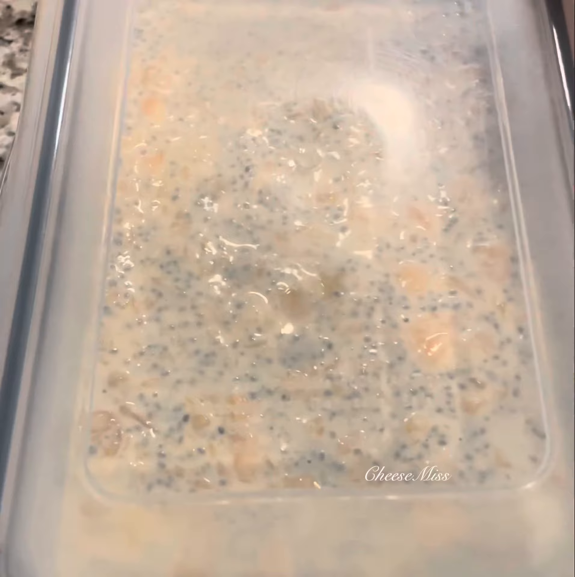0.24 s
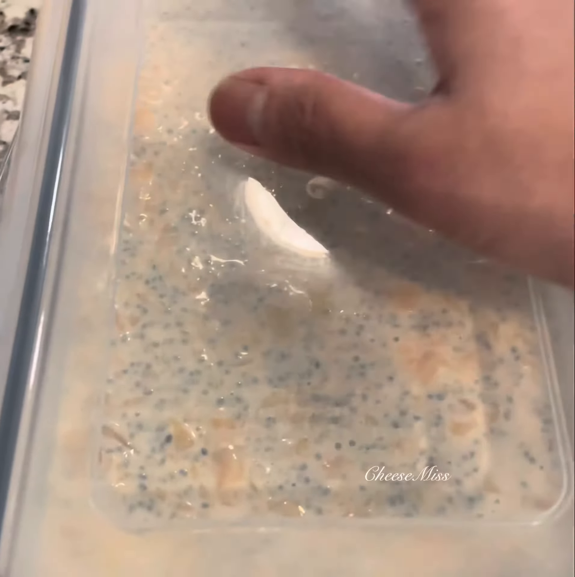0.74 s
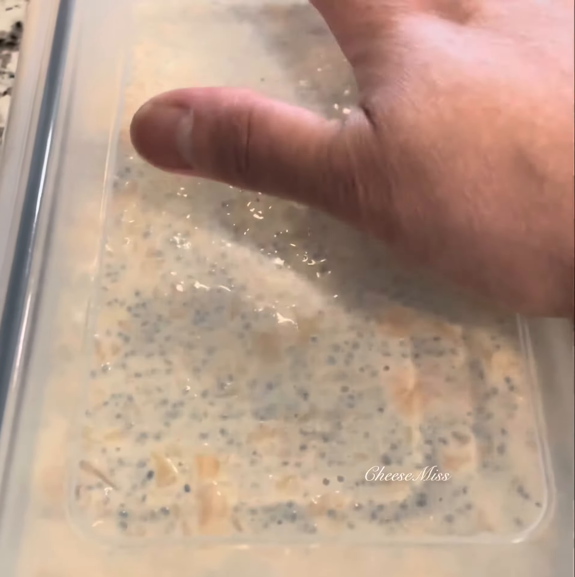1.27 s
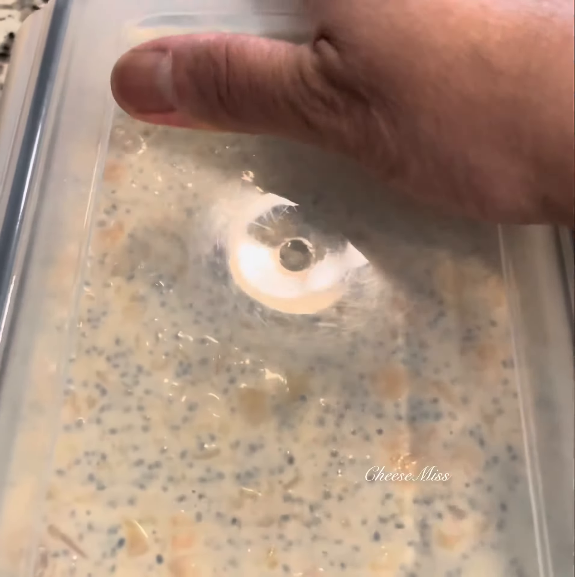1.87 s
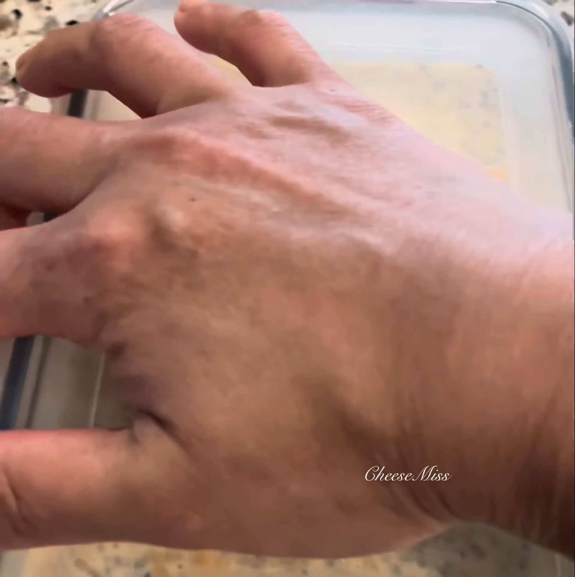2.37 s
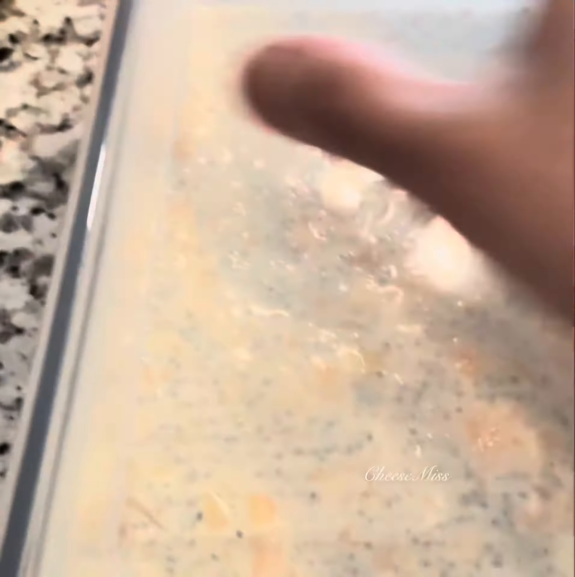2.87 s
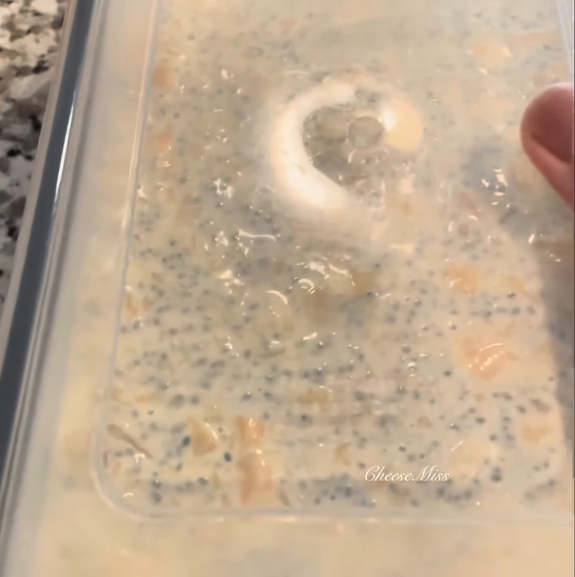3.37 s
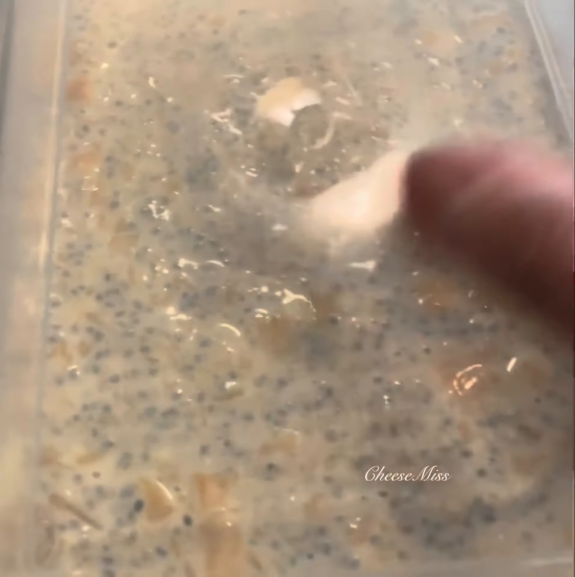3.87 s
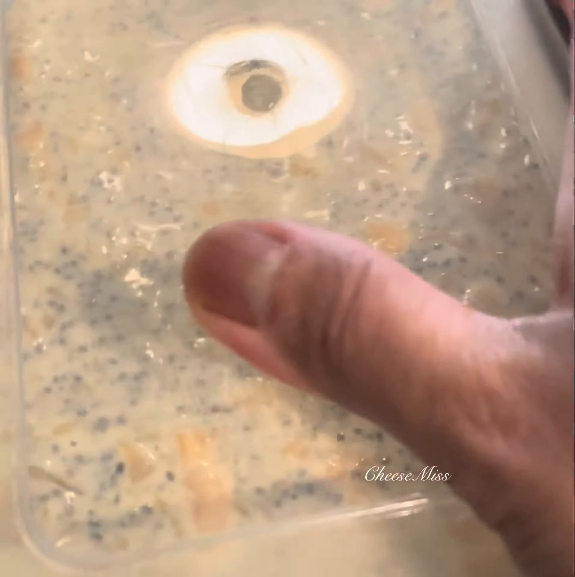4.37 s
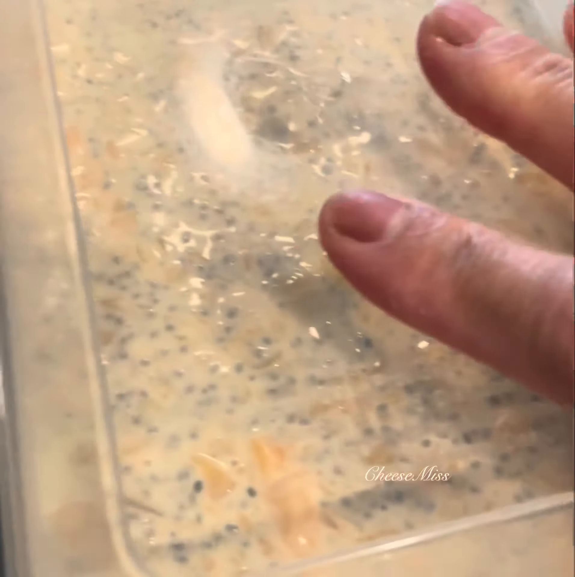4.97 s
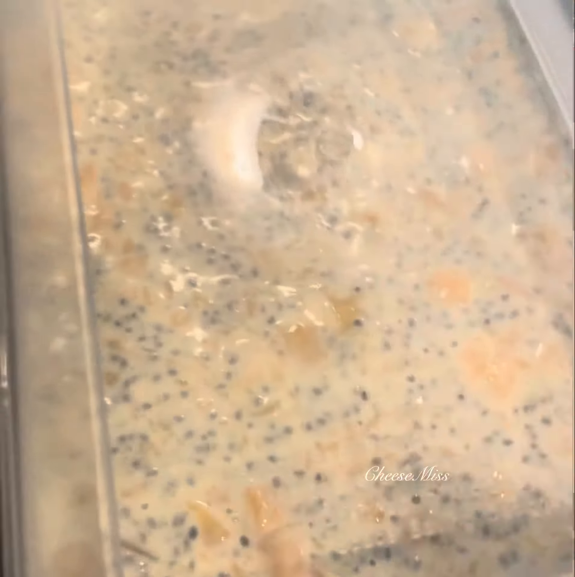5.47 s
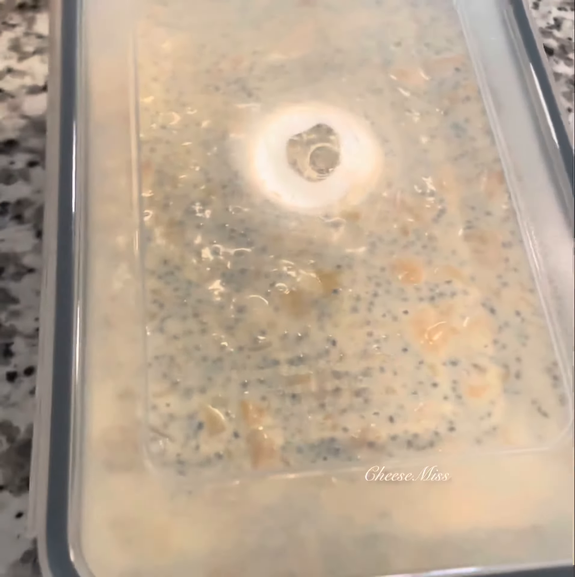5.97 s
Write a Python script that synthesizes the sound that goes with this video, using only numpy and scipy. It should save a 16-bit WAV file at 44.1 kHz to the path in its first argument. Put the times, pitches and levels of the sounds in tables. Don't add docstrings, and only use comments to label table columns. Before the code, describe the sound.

Close-up plastic lid rattles down and settles, followed by crisp latch clicks, soft palm thuds, faint seal creaks and skin rubbing over quiet room hum.

```python
import sys
import numpy as np
from scipy import signal
from scipy.fft import rfft, irfft, next_fast_len
from scipy.io import wavfile

SR = 44100
rng = np.random.default_rng(int(sys.argv[2]) if len(sys.argv) > 2 else 0)


def volts_from_decibels(level):
    exponent = np.asarray(level, float) / 20
    return 10 ** exponent


def dump_mix(stems):
    frames = np.atleast_2d(stems).T
    limited = np.clip(frames, -1, 1)
    pcm = np.round(limited * 32767).astype(np.int16)
    wavfile.write(sys.argv[1], SR, pcm)


N = 275184


def loose_lid():
    # start in seconds, strength in dB, panel note in Hz, weight in dB, softness in dB
    bounces = [(0.0271, -8, 878, -13, 21), (0.0837, -13, 862, -10, 17.5), (0.0948, -19, 800, -9, 19),
               (0.1058, -20.5, 770, -6.5, 21), (0.132, -32, 780, -8, 19), (0.1608, -24, 285, -13, 11),
               (0.2816, -37.5, 750, -4, 34), (0.3052, -31, 725, -11.5, 45), (0.3902, -26.5, 644, 4.5, 15),
               (0.3992, -20.5, 677, -5, 23), (0.4521, -12.5, 730, -21, 13.5),
               (0.4665, -14.5, 684, -17, 17.5), (0.4774, -7.5, 592, -11, 15),
               (0.4954, -17, 610, -9.5, 20.5), (0.4185, -31, 690, -18, 5), (0.5717, -43.5, 494, -5, -2),
               (0.7905, -38, 570, -26, 17)]
    return contacts(bounces, travel_s=0.001217, spread_s=0.00306, cycles=4.6, note_db=24.0,
                    trims_db=[6.0, 3.15, 4.3, 3.2], swell=1.7)


def latches():
    # start in seconds, strength in dB, panel note in Hz, weight in dB, softness in dB
    snaps = [(1.1093, -23.5, 1150, -8, 32), (1.1176, -22, 541, -17, 26), (1.1239, -20, 750, -5, 22),
             (1.1317, -12, 338, -12, 8.5), (1.1434, -20, 368, 8, 4.5), (1.148, -32.5, 231, 16.5, 24),
             (1.721, -27, 433, -6, 3.5), (1.7376, -28, 453, 1.5, 2), (1.7639, -27.5, 455, -8, 19),
             (2.5143, -40, 247, 2, 1), (2.5202, -54, 493, 4.7, -25), (4.378, -31, 293, -17, 7),
             (4.5049, -33, 427, -5, 17), (4.5186, -29.5, 194, -17, 22), (4.5343, -30, 527, -16, 9),
             (4.545, -30, 554, -17, 15), (4.5594, -41.5, 423, 3, 3)]
    # start in seconds, strength in dB, panel note in Hz, weight in dB, softness in dB
    far_snaps = [
        (1.7488, -5, 372, -5.5, 8.5),
        (2.4955, -54, 300, -7, -11),
        (2.5035, -20, 413, -2, -10.5),
        (4.3045, -19, 420, 0, 3.5),
        (4.3068, -11, 414, -4, 3),
        (4.311, -31, 267, 20.5, 6),
        (5.0345, -22.5, 302, 4.5, 4.5),
        (5.0442, -15, 434, -3, 3.5),
    ]
    near = contacts(snaps, travel_s=0.002037, spread_s=0.003984, cycles=5.0, note_db=18.0,
                    trims_db=[4.3, 0.1, 5.0, 2.3])
    far = contacts(far_snaps, travel_s=0.003003, spread_s=0.00288, cycles=2.93, note_db=13.0,
                   trims_db=[2.44, 1.6, 3.5, 5.66], swell=1.2)
    return near + far


def fingers():
    # start in seconds, strength in dB, panel note in Hz, weight in dB, softness in dB
    ticks = [(0.996, -34, 234, -10.5, 3), (1.5267, -32, 317, -9.5, 17), (2.1031, -33, 580, -10, 21),
             (2.1165, -40, 310, 6, 15), (2.2066, -33.5, 1060, -13.5, 8), (2.9722, -28, 483, -11, 10.5),
             (3.0539, -38, 300, 1.5, 21), (3.078, -37, 257, 9.5, 16), (3.634, -31.5, 353, -0.5, 28),
             (4.0334, -34.5, 330, 4.5, 16.5), (4.058, -39.5, 177, 10, 19.5), (4.8087, -32, 494, -.6, 12.5),
             (5.248, -31.5, 550, -25, 22), (5.272, -32.5, 373, -8, 31)]
    # start in seconds, strength in dB, panel note in Hz, weight in dB, softness in dB
    scuffs = [(.0024, -49.5, 770, -16, -1), (.444, -24, 760, -10, 14.5), (2.083, -45, 231, 2, 9.5),
              (2.831, -43, 376, 6, 3.5), (3.022, -37.5, 530, -8, 14.5), (3.1916, -35.5, 207, 1, 2.5),
              (3.779, -40.5, 470, 8, 12.5), (4.256, -48.5, 420, 10, 4)]
    ticking = contacts(ticks, travel_s=0.002095, spread_s=0.00317, cycles=4.2, note_db=14.5,
                       trims_db=[4.6, .3, 6.7, 1.5])
    scuffing = contacts(scuffs, travel_s=0.0018, spread_s=0.013, cycles=3.3, note_db=14.5,
                        trims_db=[3.0, -3.0, 5.0, 5.0], fade=0.67)
    return ticking + scuffing


def fingertip_taps():
    # start in seconds, strength in dB, panel note in Hz, weight in dB, softness in dB
    taps = [(2.941, -46, 541, -5, 15), (3.745, -45.5, 420, -2, 12), (3.768, -60, 500, -8, -6),
            (3.798, -45.5, 400, -6, 5), (3.923, -51, 2100, -8, 20), (3.946, -45.5, 400, 2, 13.5),
            (3.969, -45.5, 1900, -6, 12), (3.984, -42, 458, 2, 14), (4.012, -49, 431, 4, 18),
            (4.062, -44, 220, 6, 8), (2.135, -44, 300, 3.5, 18.5), (4.552, -38, 500, -8, 14)]
    return contacts(taps, travel_s=0.001906, spread_s=.003, cycles=4.0, note_db=15, trims_db=[4, .3, 5, 3.3])


def contacts(table, travel_s, spread_s, cycles, note_db, trims_db, fade=1.86, swell=1):
    band_hz = [230, 820, 2100, 4600]
    # frequency in Hz, level in dB
    air = [(2200, -3), (3200, -5), (4600, 2.5), (6300, -2.5), (7600, -21), (10500, -7.5), (14000, -29),
           (16500, -33.5)]
    # frequency in Hz, left-right level in dB, left lead in radians
    port_pair = [(152, -1, 0.04), (348, 2, 0.3), (800, -5, -1.37), (1500, -4, -0.28), (3140, 0, 1),
                 (9100, 1.5, -1.5)]
    size, paths, out = 2048, 16, np.zeros((2, N + 2048))
    hz = np.fft.rfftfreq(size, 1 / SR)
    place = np.interp(np.log(hz + 1), np.log(band_hz), np.arange(4))
    bands = np.array([np.cos(np.pi / 2 * np.clip(place - k, -1, 1)) ** 2 for k in range(4)])
    bands *= volts_from_decibels(at_hz(air, hz)) * (hz / 110) ** 2 / (1 + (hz / 110) ** 2)
    half = np.array([[.5], [-.5]])
    ports = volts_from_decibels(half * at_hz(port_pair, hz)) * np.exp(1j * half * at_hz(port_pair, hz, column=2))
    chances = rng.random((len(table), 3, paths))
    for (s, knock_db, note_hz, weight_db, soft_db), luck in zip(table, chances):
        late = np.arange(paths) / paths * (0.6896 + 0.6223 * luck[0])
        gain = np.exp(-fade * late) * np.where(luck[1] < .5, -1, 1) * (.5 + luck[0])
        skew = 0.00012 * (luck[2] - .5) * half
        bend = 2 * travel_s * (1 + 1.5325 * late[:, None]) * np.sqrt(1000 * hz)
        turns = bend + (spread_s * late + skew)[:, :, None] * hz
        wave = np.einsum("p,cpf->cf", gain, np.exp(-2j * np.pi * turns))
        first = np.exp(-2j * np.pi * bend[0])
        detune = hz / note_hz - note_hz / (hz + 1)
        note = volts_from_decibels(note_db) / (1 + 1j * cycles * detune) ** swell
        parts = irfft((wave + note * first) * ports * bands[:, None], size)
        parts /= np.abs(parts.mean(axis=1)).max(axis=1)[:, None, None]
        blow = volts_from_decibels(knock_db + np.array([weight_db, 0, -0.64 * soft_db, -soft_db]) + trims_db)
        hit = np.einsum("b,bct->ct", blow, parts)
        at = max(round((s - travel_s * 0.4405) * SR), 0)
        out[:, at:at + 1792] += irfft(rfft(hit) * blow_colour(s, hz), size)[:, :1792]
    return out[:, :N]


def blow_colour(s, hz):
    # time in
    # seconds, band centre in Hz, lift in dB, sharpness (no unit)
    band_lifts = [(.027, 405, -8.5, 4.0), (.027, 1320, -8, 8.2), (.027, 5200, 5.5, 6.1), (.084, 400, -9, 5.0),
                     (.084, 2580, 8, 6.0), (.084, 15000, -8, 2.5), (.458, 2710, 4, 5.4), (.474, 140, -7, 3.0),
                     (.474, 356, 6.5, 6.7), (.474, 5170, 8, 7.4), (.474, 15600, -19, 3.2), (1.138, 509, 4.5, 8.7),
                     (1.138, 10600, 6.5, 1.5), (1.75, 120, -5, 2.5), (1.75, 1080, 3.5, 2.7),
                     (1.75, 1680, -19.5, 5.1), (1.75, 2730, 8.5, 8.5), (1.75, 4120, 8.5, 6.0),
                     (1.75, 4900, -10, 6.8), (1.75, 6200, -16, 5.4), (1.75, 12500, 5, 1.5), (2.5, 120, -4, 3.0),
                     (2.5, 219, 13, 2.5), (2.5, 320, -4, 5.4), (2.5, 766, 10, 4.5), (2.5, 1680, 5, 4.9),
                     (2.5, 2250, 5, 5.0), (2.5, 2640, -6.5, 9.6), (4.308, 560, -8.5, 5.2), (4.308, 700, 9.5, 5),
                     (4.308, 860, 8, 5), (4.308, 1180, -5, 7.9), (4.308, 11500, 8, 5.0), (5.039, 140, -11, 2.1),
                     (5.039, 3100, -12, 7), (5.039, 6900, 3, 1.8), (5.039, 14500, -10, 2.5),
                     (.161, 490, 5.5, 4.0), (.161, 785, 9.5, 5.4), (.161, 1130, -9.5, 4.0),
                  (.161, 1510, 5.5, 6.0), (.161, 2760, -6, 6.0), (.394, 2350, 7, 4.0), (.394, 3150, -11, 5.0),
                  (.477, 1170, -6, 5.0), (.477, 12500, 12, 3.0), (.996, 2750, -7, 2.8),
                  (1.117, 4800, 7.5, 4.0), (1.527, 805, -8.5, 5.0), (1.527, 2600, 7, 4.0),
                  (1.527, 10500, -9, 1.5), (1.721, 2170, -7, 6.0), (1.721, 4440, -6, 6.0),
                  (1.736, 1450, 7, 3.0), (1.736, 3100, -10, 6.0), (1.736, 10800, -9, 3.0),
                  (2.207, 290, 8, 1.5), (2.207, 1580, -7, 4.4), (2.207, 3680, 10.5, 3.7),
                  (2.207, 5000, -9, 6.0), (2.972, 740, -11, 5.0), (2.972, 6350, 5, 6.0),
                  (3.077, 680, -11, 2.5), (3.077, 3100, -9, 6.0), (3.077, 5000, 8, 3.0),
                  (3.192, 3500, -8, 6.0), (3.779, 4840, 12, 4.0), (4.033, 220, 15, 3.0), (4.033, 600, -9, 5.0),
                  (4.033, 1200, 7, 6.0), (4.033, 1710, -10, 6.0), (4.378, 500, 6, 4.4), (4.378, 1060, -8, 6.0),
                  (4.809, 1700, -9, 3.0), (4.809, 2750, -13, 5.5), (4.809, 4000, 7, 2.3), (5.031, 584, 5, 5.6),
                  (5.031, 1710, -8, 7.2), (5.048, 221, 10.5, 4.7), (5.048, 790, 8, 4.3), (5.248, 523, 9, 1.5),
                  (5.248, 1030, -13, 3.0), (5.248, 2600, -9, 4.0)]
    colour = 1
    for struck_s, centre_hz, lift_db, sharpness in band_lifts:
        if abs(struck_s - s) < .0095:
            off = 1j * sharpness * (hz / centre_hz - centre_hz / (hz + 1))
            colour = colour * (volts_from_decibels(lift_db / 2) + off) / (volts_from_decibels(-lift_db / 2) + off)
    return colour


def rim_notes():
    # start in seconds, pitch in Hz, level in dB, time to fade by 60 dB in seconds
    rim = [(1.134, 1150, -16, 0.037), (1.721, 2580, -19, 0.021), (1.722, 1380, -22.5, 0.023),
           (1.7505, 1150, -12.5, 0.03), (1.7495, 4250, -17, 0.016), (2.837, 5420, -30, 0.012),
           (3.193, 2460, -28, 0.034), (3.194, 4300, -35, 0.021), (4.308, 1040, -14, 0.039),
           (5.045, 2050, -7.5, 0.02), (5.047, 503, -5, 0.019), (3.078, 1090, -31, 0.028),
           (3.783, 430, -33.5, 0.066), (3.199, 1190, -28.5, 0.021), (4.378, 1960, -27, 0.013),
           (1.767, 2120, -34, .09), (1.76, 985, -36, 0.22), (1.76, 1400, -36.5, .15),
           (5.068, 480, -38, .12), (5.06, 1090, -43, .12), (2.5145, 5300, -29, .012),
           (2.5046, 5200, -12, .008), (1.133, 5000, -20, .012), (4.32, 1100, -34.5, 0.14),
           (.422, 740, -29, .045), (.508, 650, -21, .025), (.532, 660, -28, .03), (1.752, 1010, -16, .03),
           (5.046, 1020, -16, .025), (2.506, 760, -18, .02), (.399, 5100, -36, .02)]
    return rings(rim, rise_s=.0005)


def rings(rows, rise_s):
    out, t = np.zeros(N + SR // 2), np.arange(SR // 2) / SR
    for s, hz, level_db, t60 in rows:
        at = round(s * SR)
        swelling = 1 - np.exp(-t / rise_s)
        out[at:at + len(t)] += volts_from_decibels(level_db - 60 * t / t60) * swelling * np.sin(2 * np.pi * hz * t)
    return out[:N]


def crackle(per_s, travel_s):
    # start in seconds, length in seconds, level in dB, swell in dB
    creeps = [
        (1.091, 0.039, -49, 22.5),
        (1.141, 0.033, -34.5, -20),
        (4.252, .055, -51, 7),
        (4.32, 0.053, -44, -12.5),
    ]
    # frequency in Hz, level in dB
    slip = [(150, -25), (500, 1.5), (1300, 7), (2800, -3), (6500, -21), (8000, -68)]
    sizes = volts_from_decibels(0.89 * np.minimum(rng.exponential(1, N), 3))
    slips = (rng.random(N) < per_s / SR) * rng.standard_normal(N) * sizes
    hz = np.fft.rfftfreq(2048, 1 / SR)
    chirp = irfft(volts_from_decibels(at_hz(slip, hz)) * np.exp(-4j * np.pi * travel_s * np.sqrt(1000 * hz)))
    grains = signal.fftconvolve(slips, chirp[:1024])[:N]
    ends = [[(s, db), (s + length, db + swell_db)] for s, length, db, swell_db in creeps]
    return grains / grains.std() * sum(gate(rows) * volts_from_decibels(in_time(rows)[0]) for rows in ends)


def along_the_rim():
    # time in seconds, left-right level in dB
    hand_place = [
        (.1, -.6),
        (.5, .3),
        (1.13, -1.2),
        (1.75, -2.2),
        (2.5, .3),
        (4.3, .3),
        (5.04, -2.2),
    ]
    return volts_from_decibels(in_time(hand_place)[0] * [[.5], [-.5]])


def port_colour(lid):
    # frequency in Hz, level in dB
    side_port = [(150, -6.5), (350, 0.5), (1000, 0.5), (4000, -0.5), (5400, -7.5), (7500, 14.5), (9800, -1),
                 (11000, -20.5), (12500, 3.5), (16000, 6)]
    side = (lid[0] - lid[1]) / 2
    size = next_fast_len(N)
    change = volts_from_decibels(at_hz(side_port, np.fft.rfftfreq(size, 1 / SR))) - 1
    return irfft(rfft(side, size) * change, size)[:N] * [[1], [-1]]


def palm_pushes():
    # start in seconds, level in dB, pitch in Hz
    pushes = [
        (0.021, -33, 129),
        (0.472, -21.5, 94),
        (1.148, -15.5, 81.5),
        (2.122, -30, 110),
        (3.079, -42, 132),
        (4.053, -29.5, 117),
        (4.305, -22.5, 127),
    ]
    return rings([(s, hz, level_db + 5.0, .09) for s, level_db, hz in pushes], rise_s=0.0022)


def creak():
    # start in seconds, length in seconds, level in dB, start in Hz, end in Hz
    creaks = [
        (3.472, 0.065, -42, 440, 425),
        (3.582, 0.05, -36, 390, 373),
        (3.665, 0.005, -38, 360, 343),
        (5.27, 0.037, -40, 460, 410),
    ]
    # start in seconds, length in seconds, level in dB, start in Hz, end in Hz
    whistles = [
        (2.444, 0.044, -54, 5610, 4360),
        (3.74, .04, -64, 5700, 4900),
    ]
    # start in seconds, length in seconds, level in dB, pitch in Hz, fade in dB
    buzzes = [
        (1.756, 0.16, -57, 4260, 16),
        (5.075, .12, -64, 2090, 12),
        (5.234, 0.11, -52.5, 2040, 12),
    ]
    seal = sum(squeak(glide(*row), width_hz=90, steady=2.6) for row in creaks)
    air, flap = 0, 0
    for s, length, db, a, b in whistles:
        air = air + squeak(glide(s, length, db, a, b, -3.0), width_hz=420, steady=0)
        air = air + squeak(glide(s, length, db - 5, 2 * a, 2 * b, -2.5), width_hz=460, steady=0)
    for s, length, db, hz, fades_db in buzzes:
        flap = flap + squeak(glide(s, length, db, hz, hz, fades_db), width_hz=hz / 15, steady=.4)
    return seal + (air + flap) * volts_from_decibels([[1.5], [-1.5]])


def squeak(rows, width_hz, steady):
    level_db, hz = in_time(rows)
    low_pass = signal.butter(2, width_hz / 2, fs=SR, output="sos")
    sway = signal.sosfilt(low_pass, rng.standard_normal((2, N)))
    sway /= sway.std()
    phase = 2 * np.pi * np.cumsum(hz) / SR
    tone = (steady + sway[0]) * np.sin(phase) + sway[1] * np.cos(phase)
    return gate(rows) * volts_from_decibels(level_db) * tone / np.hypot(1, steady / np.sqrt(2))


def glide(s, length, level_db, start_hz, end_hz, fades_db=3):
    return [(s, level_db, start_hz), (s + length, level_db - fades_db, end_hz)]


def hand():
    # time in seconds, peak in dB, length in seconds
    slides = [(.1, -70, 0.027), (.21, -67, 0.095), (.39, -64, .03), (.47, -63, 0.051), (.65, -60, 0.096),
              (.99, -65.5, 0.062), (1.13, -64, .04), (1.63, -62.5, 0.048), (1.76, -70, 0.39),
              (2.02, -64.5, 0.029), (2.12, -61, .03), (2.26, -71, 0.24), (2.47, -52, 0.045),
              (2.61, -57, 0.12), (3.07, -68, 0.061), (3.2, -63, 0.03), (3.31, -68, .02), (3.46, -68, .05),
              (3.85, -61.5, 0.17), (4.29, -58.5, 0.046), (4.44, -74, 0.22), (4.655, -52, 0.06),
              (4.82, -72, 0.23), (5.05, -69, .04), (5.12, -70, .12), (5.308, -55, 0.0097),
              (5.36, -68, 0.054), (6.14, -73, 0.065)]
    # time in seconds, peak in dB, length in seconds
    drags = [(.13, -53.5, 0.14), (.05, -50, .04), (.5, -53.5, 0.18), (1.16, -62, 0.22), (1.78, -53, 0.18),
             (2.6, -48.5, 0.23), (3.1, -61, 0.47), (3.7, -65, 1), (4.35, -48.5, 0.12), (4.62, -58, 0.43),
             (5.15, -55, 0.36), (5.27, -62, .12), (.43, -55, .03)]
    # time in seconds, peak in dB, length in seconds
    leans = [(.12, -31, 0.095), (.5, -42.5, 0.3), (1.16, -32.5, 0.13), (1.84, -38.5, 0.16),
             (2.44, -42, 0.11), (3.02, -41.5, 0.24), (3.55, -45.5, 0.42), (4.21, -37, 0.13),
             (4.5, -48.5, 0.54), (4.88, -42, 0.25)]
    # frequency in Hz, level in dB per Hz
    hiss_mid = [(1760, -36), (3000, -15.5), (5950, -1.5), (7860, -37), (8200, -8.5), (10800, -3),
                (13100, -11), (13700, -43.5), (15800, -8), (16500, -28)]
    hiss_side = [(1760, -31.5), (3000, -2), (4220, 0.5), (9330, 9.5), (10500, -8.5), (11200, -39),
                 (11700, -1.5), (14800, 3), (16200, -1), (16500, -41)]
    rub_mid = [(500, -28), (800, -3), (1150, -0.5), (1690, -3.5), (2300, -3), (4900, -9), (6660, -13.5),
               (7500, -44.5), (16500, -110)]
    rub_side = [(410, -37.5), (700, -6.5), (1120, 8), (1690, -12.5), (2970, 0.5), (5240, -8), (8000, -7.5),
                (10000, -24), (13000, -56), (22000, -120)]
    rumble_colour = [(60, 11.5), (150, 4), (400, 14), (650, -8), (1200, -38)]
    hiss = strokes(slides, rest_db=-81) * flicker(30, 2.2) * wide(hiss_mid, hiss_side, side_db=-0.5)
    rub = strokes(drags, rest_db=-68) * flicker(28, 2.4) * wide(rub_mid, rub_side, side_db=-2.5)
    lean = volts_from_decibels(-5.5) * strokes(leans, rest_db=-53.5) * flicker(25, 2.2)
    return hiss + rub + lean * wide(rumble_colour, rumble_colour, side_db=-20)


def strokes(rows, rest_db):
    t, power = np.arange(0, N, 64) / SR, volts_from_decibels(rest_db) ** 2
    for s, peak_db, length in rows:
        away = np.where(t < s, s - t, (t - s) / 1.06) / length
        power = power + volts_from_decibels(peak_db - 15 * away ** 1.46) ** 2
    return np.interp(np.arange(N) / SR, t, np.sqrt(power))


def kitchen(x):
    # frequency in Hz, time to fade by 60 dB in seconds
    fade_times = [(200, 0.1), (2000, 0.46), (10000, 0.22)]
    t, echo = np.arange(SR // 2) / SR, 0
    for low in 100 * 2. ** np.arange(7):
        octave = signal.butter(2, [low, 2 * low], "band", fs=SR, output="sos")
        band = signal.sosfilt(octave, rng.standard_normal((2, len(t))))
        echo = echo + band * volts_from_decibels(-60 * t / at_hz(fade_times, low * 1.78))
    echo *= np.minimum(t / 0.006, 1)
    return signal.fftconvolve(x, echo / np.sqrt(np.sum(echo ** 2) / 2), axes=1)[:, :N]


def kitchen_hum():
    # frequency in Hz, level in dB per Hz
    hum_mid = [(25, -20.5), (42, -1.5), (125, -1.5), (150, -9), (221, -5.5), (320, -16.5), (540, -11.5),
               (780, -20.5), (1100, -19.5), (5450, -42), (7270, -68.5), (11400, -57), (13300, -74.5),
               (16000, -89)]
    hum_side = [(18, -43.5), (30, -22), (98, -15), (259, -11.5), (526, -1), (1500, -12), (1860, -18),
                (3310, -17), (6050, -42.5), (9970, -46.5), (10800, -59.5), (14400, -47), (16000, -64.5)]
    return volts_from_decibels(-46) * flicker(23, 0.37) * wide(hum_mid, hum_side, side_db=-8.0)


def at_hz(points, hz, column=1):
    points = np.array(points)
    return np.interp(np.log(hz + 1), np.log(points[:, 0]), points[:, column])


def in_time(rows):
    s, *columns = np.transpose(rows)
    return [np.interp(np.arange(N) / SR, s, c) for c in columns]


def gate(rows):
    start, end = rows[0][0], rows[-1][0]
    return np.interp(np.arange(N) / SR, [start - .008, start, end, end + 0.018], [0, 1, 1, 0])


def noise(spectrum):
    size = next_fast_len(N)
    colour = volts_from_decibels(at_hz(spectrum, np.fft.rfftfreq(size, 1 / SR)))
    x = irfft(rfft(rng.standard_normal(size)) * colour, size)[:N]
    return x / x.std()


def wide(mid, side, side_db):
    return noise(mid) + volts_from_decibels(side_db) * noise(side) * [[1], [-1]]


def flicker(rate, depth_db):
    slow = rng.standard_normal(N // 200 + 2)
    slow = signal.sosfiltfilt(signal.butter(1, rate, fs=SR / 200, output="sos"), slow)
    return volts_from_decibels(depth_db * np.interp(np.arange(N) / 200, np.arange(len(slow)), slow / slow.std()))


def scene():
    loose = loose_lid()
    lid = loose + latches() + fingers()
    lid += (rim_notes() + crackle(per_s=1200, travel_s=0.002045)) * volts_from_decibels([[-1.5], [1.5]])
    lid *= along_the_rim()
    lid = lid + volts_from_decibels(-18.0) * kitchen(lid - .55 * loose)
    lid = lid + port_colour(lid)
    return lid + palm_pushes() + creak() + hand() + kitchen_hum() + fingertip_taps()


def top_cut(x):
    return signal.sosfilt(signal.butter(12, 16810, fs=SR, output="sos"), x)


def record(dry):
    bass = signal.sosfilt(signal.butter(2, 220, fs=SR, output="sos"), dry)
    sharp = signal.sosfilt(signal.butter(2, 1800, "high", fs=SR, output="sos"), dry[0]) ** 2
    r = np.exp(-1 / (.07 * SR))
    load = signal.lfilter([(1 - r) ** 2], [1, -2 * r, r * r], sharp)
    dry = dry - bass * (1 - 1 / (1 + 4000 * load))
    dry = signal.sosfilt(signal.cheby2(10, 50, 16100 * 1.05, fs=SR, output="sos"), np.tanh(dry))
    dry = signal.sosfilt(signal.butter(2, 36, "high", fs=SR, output="sos"), dry)
    return top_cut(dry)


dry = scene()
out = record(dry)
dump_mix(out)
```